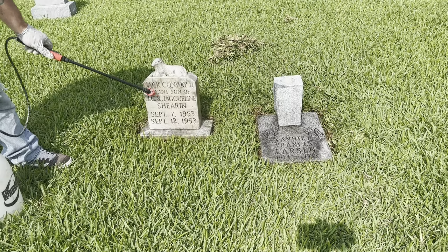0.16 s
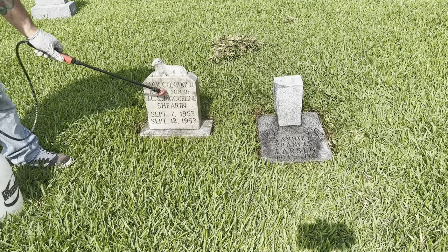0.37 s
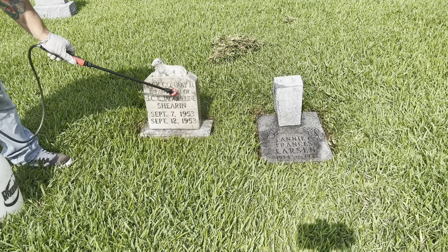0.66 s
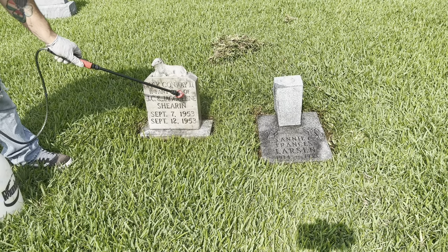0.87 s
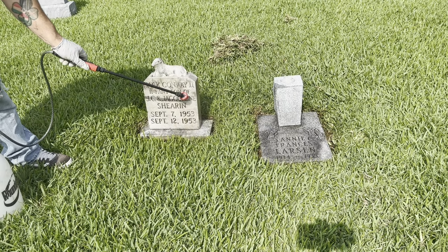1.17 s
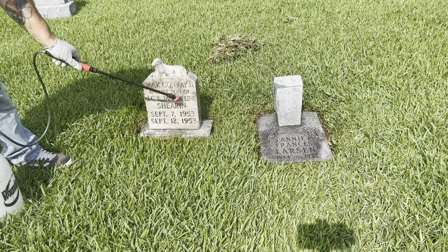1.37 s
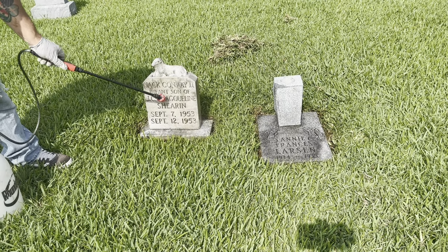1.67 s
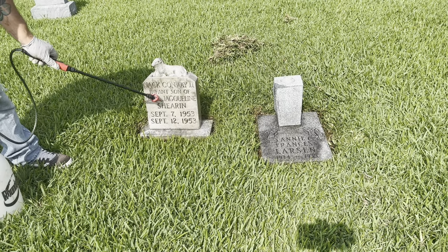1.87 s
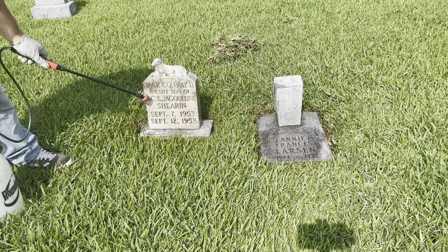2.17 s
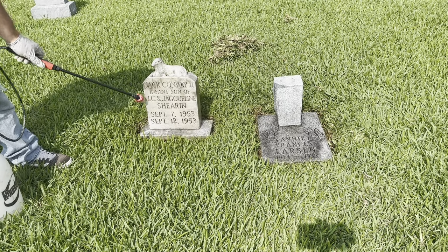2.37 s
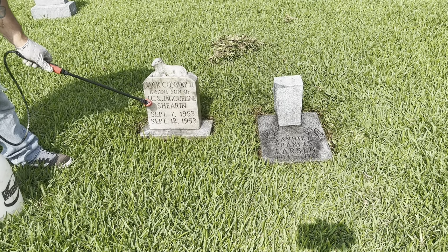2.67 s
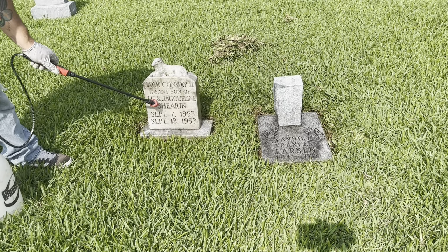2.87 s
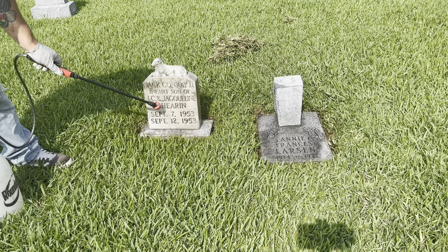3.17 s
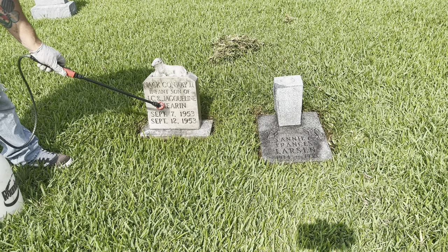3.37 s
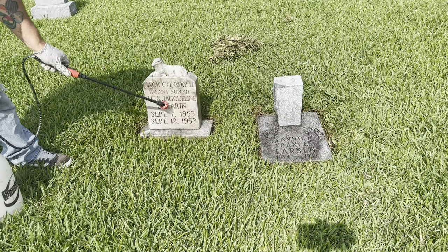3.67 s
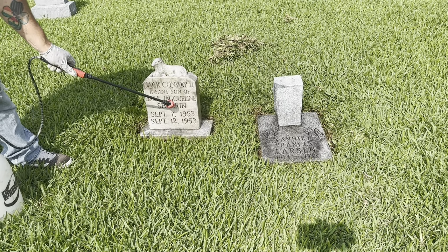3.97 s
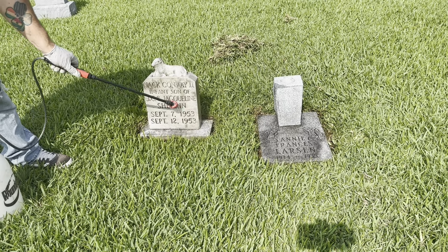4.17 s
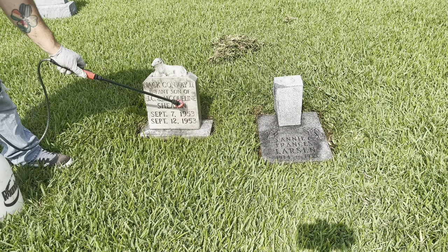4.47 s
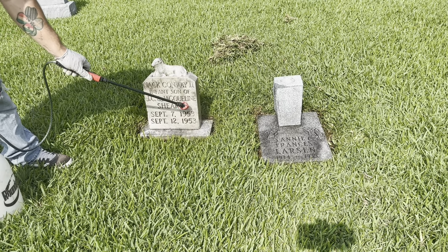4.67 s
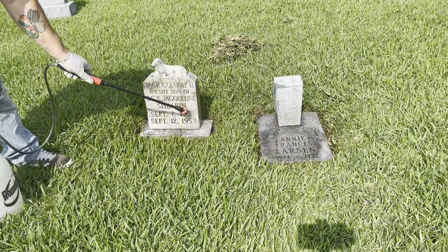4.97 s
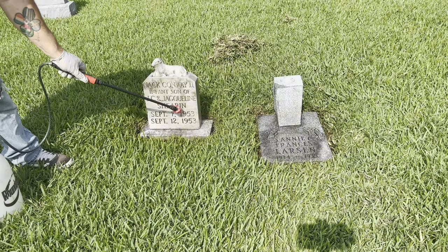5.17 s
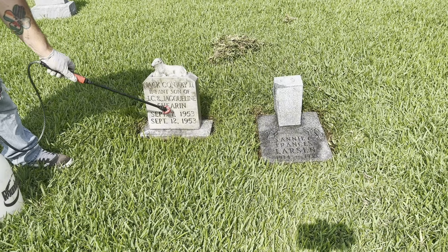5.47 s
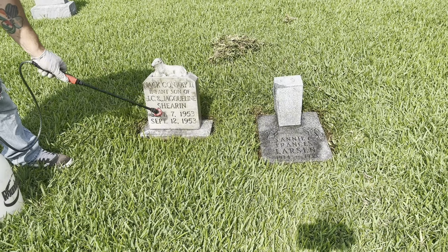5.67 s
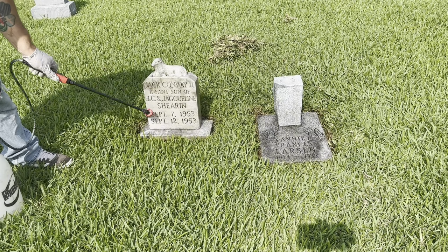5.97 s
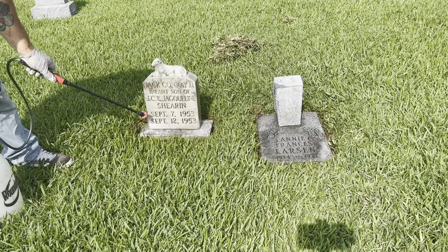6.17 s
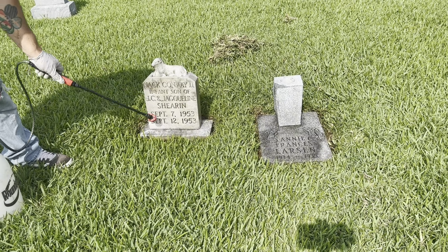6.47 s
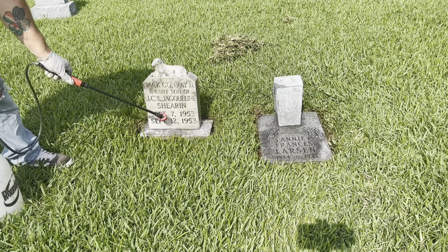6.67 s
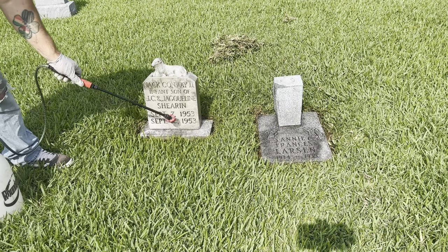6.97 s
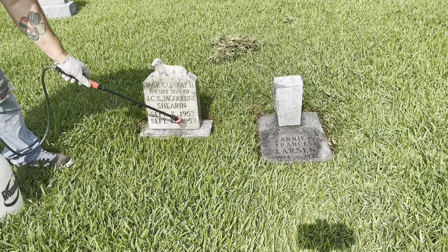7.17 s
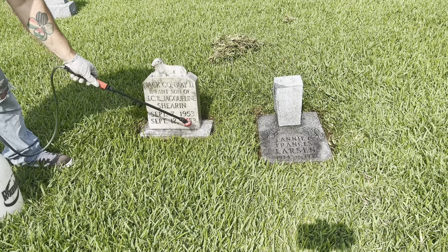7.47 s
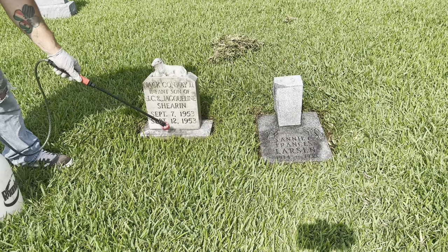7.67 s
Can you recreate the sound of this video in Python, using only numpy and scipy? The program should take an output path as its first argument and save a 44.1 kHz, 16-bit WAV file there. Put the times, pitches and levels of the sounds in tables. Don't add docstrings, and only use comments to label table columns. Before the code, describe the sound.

A hand sprayer's steady, bright hiss plays over stone close by outdoors, spitting and splashing, dipping at times, over a faint low traffic rumble.

```python
import sys
import numpy as np
from scipy import signal
from scipy.fft import rfft, irfft, next_fast_len
from scipy.io import wavfile
from scipy.ndimage import uniform_filter1d

SR = 44100
rng = np.random.default_rng(int(sys.argv[2]) if len(sys.argv) > 2 else 0)


def decibels_to_gain(level_db):
    exponent = np.asarray(level_db, float) / 20
    return 10 ** exponent


def wrap_up_sound(samples):
    columns = np.atleast_2d(samples).T
    tamed = np.clip(columns, -1, 1)
    steps = np.round(tamed * 32767).astype(np.int16)
    wavfile.write(sys.argv[1], SR, steps)


N = 344852
FAST = next_fast_len(N)
HOP = 128


def evened(x):
    return x / np.sqrt(np.mean(x ** 2) + 1e-20)


def read(points, hz):
    f, *values = np.transpose(points)
    return np.squeeze([np.interp(np.log(hz + 1), np.log(f + 1), v) for v in values])


def play(rows, t):
    s, *values = np.transpose(rows)
    return [np.interp(t, s, v) for v in values]


def bells(s, width, t):
    return np.exp(-.5 * ((t[:, None] - s) / width) ** 2)


def drift(rate, count):
    slope = 1 / (1 + (np.fft.rfftfreq(FAST, 1 / SR) / rate) ** 2)
    slope[0] = 0
    return evened(irfft(rfft(rng.standard_normal((count, FAST))) * slope, FAST)[:, :N])


def spectra(x, size=4 * HOP):
    return signal.stft(x, SR, nperseg=size, noverlap=3 * size // 4)


def sound(z):
    size = 2 * z.shape[-2] - 2
    return signal.istft(z, SR, nperseg=size, noverlap=3 * size // 4)[1][..., :N]


# t/s, force level/dB, slant/dB (+ wide fan, - hard point), spatter/dB, splash/dB
AIM = [(0, -43.5, -0.5, 3, -45.5), (.5, -39.5, 0, -0.5, -42.5), (.85, -42.5, 3.5, 0, -45.5),
       (1.3, -42, 3.5, 1, -47), (1.9, -41.5, 3, 4.5, -49), (2.35, -44.5, -1.5, 0, -38.5),
       (2.7, -44.5, 3.5, 4, -50.5), (3.1, -43, -1.5, -3.5, -50.5), (3.8, -43.5, -2, 0, -45.5),
       (4.5, -43.5, 4, 0.5, -46), (5.0, -46, 4.5, 2.5, -52.5), (5.55, -45.5, 1.5, 3, -47.5),
       (5.78, -45.5, 2.5, 1.5, -69), (6.2, -47, -2.5, 1, -44.5), (6.65, -49, -3, 0.5, -65),
       (6.9, -48, -1, 0.5, -48), (7.4, -52, -1, 3.5, -64.5), (7.82, -46.5, -1.5, -1.5, -57)]
# start t/s, fall/s, hold/s, recover/s, depth/dB
LULLS = [(1.363, 0.091, 0.18, 0.18, -12), (2.2, 0.12, 0.053, 0.15, -5.5), (3.301, 0.18, 0.046, .2, -7),
         (5.155, 0.078, 0.05, 0.18, -9), (5.697, 0.076, 0.028, 0.094, -9),
         (6.245, 0.082, 0.038, 0.11, -5.5), (6.577, 0.054, 0.016, 0.071, -4.5),
         (7.199, 0.12, 0.22, 0.15, -7)]
# t/s, fizz level/dB, middle follows by/dB
CATCHES = [(.02, 3.5, 0.5), (.3, 2, -2.5), (.42, -6, 3), (.48, 2, -2), (.63, -3, -0.5), (.93, 4.5, -2.5),
           (1.021, -0.5, -2), (1.35, 1.5, -1), (1.62, 0.5, 2.5), (1.7, -1, 2), (1.82, 2, -3),
           (2.0, -2, -0.5), (2.18, 4, -7), (2.27, 0.5, -2.5), (2.5, 6.5, -4.5), (2.6, 0, -2),
           (2.9, 5.5, -4), (3.14, -3, 1.5), (3.27, 2.5, 2), (3.881, 3, -4), (3.96, 1, 1), (4.02, -2, 2),
           (4.16, 1.5, 0.5), (4.22, 2, -4.5), (5.12, 2.5, 0), (5.48, 3, -4.5), (5.92, -4, 0),
           (6.03, -0.5, 0), (6.2, 2, 0), (7.05, -1, -4.5)]
# t/s, f/Hz
SPLASH_HZ = [(0, 1180), (.5, 1460), (1.2, 1160), (1.55, 1503), (2.7, 1260), (3.8, 1446), (4.9, 1278),
             (5.6, 1536), (5.75, 956), (6.6, 918), (6.85, 1227), (7.3, 959), (7.82, 1090)]


def jet(t):
    force, slant, spatter, splash = play(AIM, t)
    lull = 0
    for start, fall, hold, recover, depth_db in LULLS:
        lull = lull + np.interp(t, np.cumsum([start, fall, hold, recover]), [0, depth_db, depth_db, 0])
    s, top_db, middle_db = np.transpose(CATCHES)
    top, middle = (bells(s, 0.026, t) @ np.c_[top_db, middle_db]).T
    fizz = force + lull + top
    sizzle = spatter + 0.75 * middle
    patter = slant + middle + 0.028 * lull
    splash = splash + 0.27 * lull + 0.9 * (top + middle)
    octaves = 0.53 + .03 * slant
    return fizz, sizzle, patter, splash - fizz, play(SPLASH_HZ, t)[0], octaves


# t/s, peak level/dB
SPITS = [(0.407, -27), (0.599, -30), (0.63, -30), (0.649, -25), (1.7473, -24), (2.0581, -25), (2.154, -25),
         (2.175, -20), (2.182, -21), (2.187, -22), (2.4595, -31), (2.4792, -28), (2.7658, -30),
         (3.1837, -30), (3.9438, -29), (4.0567, -26), (5.0868, -27), (5.1376, -25), (5.3018, -33),
         (5.5322, -31), (5.878, -33), (6.0656, -31), (6.565, -35)]


def droplets(clumps_db=1.17, grain_db=-0.5, spit_s=0.00056, smooth_hz=3460.0):
    clumps = clumps_db * drift(28.0, count=1)
    grain = grain_db * drift(1800.0, count=1)
    crowd = evened(decibels_to_gain(clumps + grain)[0])
    s, db = np.transpose(SPITS)
    spit_db = db - 13 - jet(s)[0]
    kicks = np.bincount((s * SR).astype(int), decibels_to_gain(spit_db), N)[:N]
    kicks += 1.6 * rng.random(N) * (rng.random(N) < 200 / SR)
    crowd = crowd + signal.lfilter([1], [1, -np.exp(-1 / (spit_s * SR))], kicks)
    noise = rng.standard_normal((2, N))
    film = signal.lfilter(*signal.butter(1, smooth_hz, fs=SR), (crowd - 1) * noise)
    return crowd * noise - film


# t/s, off the lawn/ms, off the plinth left/ms, right/ms
ECHOES = [(0, 2.25, 0.76, 0.72), (.3, 1.56, 0.88, 0.64), (.8, 1.54, 0.88, 0.69), (1.1, 2, 0.73, 0.75),
          (1.8, 1.55, 0.74, 0.6), (2.3, 1.93, 0.78, .63), (2.7, 1.9, 0.69, 0.72), (3.1, 1.54, 0.58, 0.4),
          (3.6, 1.69, .45, 0.78), (4.4, 1.96, 0.71, 0.73), (5.05, 2.3, 0.456, 0.51), (5.4, 1.56, .72, 0.55),
          (6.3, 1.83, .81, 0.67), (6.8, 2.4, 0.52, 0.55), (7.82, 1.95, 0.61, 0.63)]
# later left/ms, later right/ms, strength/1
LAWN = [
    (0, .03, .32),
    (.31, .2, .32),
    (.68, .52, .2),
]


def echoes(hz, t, dull_hz=7060.0):
    lawn_ms, *plinth_ms = play(ECHOES, t)

    def late(ms):
        return np.exp(-2j * np.pi * hz * ms / 1000)

    paths = []
    for port in (0, 1):
        steps = sum(row[2] * late(row[port]) for row in LAWN)
        case = port * -.16 * late(.49)
        paths.append(late(lawn_ms) * steps + .28 * late(plinth_ms[port]) + case)
    return 1 + np.exp(-(hz / dull_hz) ** 2) * np.array(paths)


LAYER_HZ = (2200., 3900, 7250, 13100)
# f/Hz, level/dB per Hz
MIST = [(500, -15.5), (1200, -9.5), (2000, -4.5), (3000, -3), (5000, -2), (6300, -4), (7200, -2),
        (8500, -2), (10000, -4.5), (12000, 0), (15900, -1.5)]
# t/s, level/dB
GRASS = [(5.75, -59.5), (6.234, -46.5), (6.354, -57.5), (6.56, -56), (6.59, -65), (6.812, -83), (6.82, -65),
         (7.2, -63)]
# t/s, half length/s, f/Hz, width/octaves, level/dB
HOLLOWS = [(.1, .12, 6570, 0.12, 3), (1.05, .2, 4300, .2, 3), (2.05, 0.15, 6600, 0.1, 4.5),
           (3.75, 0.072, 1550, 0.37, 4), (4.2, .25, 720, .2, 7), (4.95, 0.18, 945, 0.2, 7),
           (1.9, 0.12, 8500, 0.17, -3.5), (5.438, 0.13, 1520, 0.33, 2), (6.201, 0.097, 1800, .15, 5),
           (6.89, 0.08, 3380, 0.058, 5.5), (7.763, .06, 700, 0.42, 15)]
# f/Hz, likeness/0-1, left leads/radians, left over right level/dB
PORTS = [(400, 0.28, 0, 0), (975, 0.71, 0.42, 3.5), (1990, 0.84, 1.52, -1.5), (2750, 0.91, 2.5, -2),
         (3940, 0.27, 2, 5), (5180, 0.76, 3, 6.5), (6920, 0.83, 0.93, 5), (7800, 0.7, 2.35, 3.5),
         (8540, 1, -2.1, 7), (9800, 0.8, -2.2, -3), (9830, 1, -2, -2.5)]


def spray(patchy_db=1.0, splash_db=4.0):
    hz, t, (near, other) = spectra(droplets())
    fizz, sizzle, patter, splash, centre, octaves = jet(t)
    octave = np.log2(hz + 1)[:, None]

    patter_swing = patter - patter.mean()
    layers = np.array([patter_swing, patter_swing, sizzle - sizzle.mean(), 0 * t])
    reach = read(np.c_[LAYER_HZ, np.eye(4)], hz)
    mist = decibels_to_gain(read(MIST, hz)[:, None] + reach.T @ layers)

    off_centre = (octave - np.log2(centre)) / np.maximum(octaves, .2)
    stone = decibels_to_gain(splash + splash_db) * np.exp(-.5 * off_centre ** 2)
    thud = decibels_to_gain(np.interp(t, *np.transpose(GRASS), -99, -99) - fizz + 11.5)
    grass = thud * np.exp(-.5 * ((octave - np.log2(690.0)) / 0.42) ** 2)
    body = np.hypot(mist, np.hypot(stone, grass))

    patches = rng.standard_normal((len(t), len(hz)))
    patches = uniform_filter1d(patches, size=40, axis=0)
    patches = evened(uniform_filter1d(patches, size=4, axis=1)).T
    s, half, ring_hz, ring_oct, ring_db = np.transpose(HOLLOWS)
    ring = ring_db * bells(np.log2(ring_hz), ring_oct, octave[:, 0]) @ bells(s, half, t).T
    colour = decibels_to_gain(fizz + 6.5 + ring + patchy_db * patches) * body

    same, lead, pan_db = read(PORTS, hz)[:, :, None]
    same = np.clip(same, 0, 1)
    right = same * near * np.exp(-1j * lead) + np.sqrt(1 - same ** 2) * other
    ports = np.array([near, right * decibels_to_gain(-pan_db)])
    return sound(colour * echoes(hz[:, None], t) * ports)


# t/s, level/dB
DRONE = [(0, -36), (.6, -39.5), (1.3, -39), (1.8, -43), (3, -44.5), (3.8, -42.5), (5, -42), (6.4, -41.5),
         (6.9, -40), (7.82, -44)]
# t/s, half length/s, depth/dB
FALTERS = [(0.045, 0.039, -22), (0.287, 0.062, -6), (1.6, .1, -7.5), (2.042, 0.076, -16.5),
           (2.457, 0.17, -9), (2.93, 0.042, -6), (3.256, 0.038, -7), (4.14, 0.084, -10.5),
           (4.401, 0.11, -4.5), (4.743, 0.032, -10), (5.277, 0.073, -8.5), (5.444, .04, -5.5),
           (5.912, 0.0571, -20), (6.1, 0.024, -13), (6.298, 0.056, -11), (6.66, 0.076, -9.5),
           (7.254, 0.1, -9), (7.596, 0.045, -6.5)]


def drone(t):
    s, width, db = np.transpose(FALTERS)
    falter = np.interp(t, t[::HOP], bells(s, width, t[::HOP]) @ db)
    return 80.5 + 0.32 * falter, play(DRONE, t)[0] + falter, falter


# f/Hz, level/dB per Hz
ROAD = [(15, -47), (25, -34), (54, -1), (81, -2.5), (104, -4.5), (266, -25.5), (421, -24.5), (678, -28.5),
        (1090, -28), (1180, -47), (2000, -32), (2600, -36), (4400, -120)]
# f/Hz, likeness/0-1
ROAD_SAME = [(60, 1), (120, 0.95), (240, 0.78), (480, 1), (950, 0.98), (1890, 0.41), (3770, 0.043),
             (15000, 0.6)]


def road(lumpy_db=1.0, lag_ms=0.37):
    hz = np.fft.rfftfreq(FAST, 1 / SR)
    tilt_db = -5.8 * np.log2(1 + hz / 4100.0)
    a, b = rfft(rng.standard_normal((2, FAST))) * decibels_to_gain(read(ROAD, hz) + tilt_db)
    same = np.clip(read(ROAD_SAME, hz), 0, 1)
    right = same * a * np.exp(-2j * np.pi * hz * lag_ms / 1e3) + np.sqrt(1 - same ** 2) * b
    wash = evened(irfft([a, right], FAST)[:, :N])
    bare_db = 0.012 * drone(np.arange(N) / SR)[2]
    return wash * decibels_to_gain(-42.0 + bare_db + lumpy_db * drift(8.3, count=1))


# t/s, f/Hz, level/dB
WHINES = [
    [(1.1, 306.1, -69), (1.152, 315.1, -69), (1.204, 334.5, -77), (1.482, 312.3, -85), (2.44, 320.5, -68),
     (2.61, 328.4, -65), (2.8, 324.5, -78)],
    [(5.6, 225.6, -61), (5.704, 226, -69), (5.818, 226.2, -82), (6.036, 235.8, -55.5), (6.326, 236, -57),
     (6.55, 238.7, -54)],
]


def engines(wobble_hz=2.68, throb_db=1.0, fade_s=0.21):
    t = np.arange(N) / SR
    waver, throb = drift(5.7, count=2)
    hz, db = drone(t)[:2]
    out = decibels_to_gain(db + throb_db * throb) * np.sin(2 * np.pi * np.cumsum(hz + wobble_hz * waver) / SR)
    for rows in WHINES:
        hz, db = play(rows, t)
        fade = np.clip(np.minimum(t - rows[0][0], rows[-1][0] - t) / fade_s, 0, 1)
        out += fade * decibels_to_gain(db) * np.sin(2 * np.pi * np.cumsum(hz) / SR)
    return np.sqrt(2) * out


# start t/s, end t/s, f/Hz, level/dB
CHIRP = (7.44, 7.52, 2756., -66.5)


def insect():
    t0, t1, hz, db = CHIRP
    t = np.arange(N) / SR
    fade = np.clip(np.minimum(t - t0, t1 - t) / 0.01, 0, 1)
    return decibels_to_gain(db) * fade * np.sin(2 * np.pi * hz * t)


def scene():
    pan_db = -2.5
    far = road() + engines() + insect()
    return spray() + far * decibels_to_gain([[pan_db / 2], [-pan_db / 2]])


def starved(z, hz, under_db):
    power = uniform_filter1d(uniform_filter1d(abs(z) ** 2, size=6, axis=1), size=3, axis=2)
    mask = uniform_filter1d(power.max(0), size=100, axis=0)
    band = np.minimum(np.arange(len(hz)) // 6 * 6 + 3, len(hz) - 1)
    block = np.arange(z.shape[2]) // 2 * 2
    weak = (power < mask * decibels_to_gain(2 * under_db))[:, band][:, :, block]
    return np.where(weak & (hz[:, None] > 1900), 0, z)


def roll_off(x):
    return signal.sosfilt(signal.butter(12, 16000, fs=SR, output="sos"), x)


# from f/Hz, to f/Hz, sign on the right, share of blocks left apart/0-1
SHARED = [
    (8400, 9650, 1, .04),
    (10380, 11800, -1, .2),
    (11800, 22050, 1, 0),
]
# t/s, up to f/Hz
APART = [(.25, 12500), (1.65, 12800), (1.76, 13500), (2.19, 13800), (2.39, 13100), (5.13, 12400),
         (5.3, 12600), (5.36, 12600)]
# start t/s, end t/s, from f/Hz, to f/Hz
MONO_PATCH = (.97, 1.22, 2100, 3600)


def record(dry):
    hz, t, z = spectra(dry, size=2048)
    block = (t * SR / 1024).astype(int)
    luck = rng.random((block[-1] + 1, len(SHARED), 2))[block]
    wander = drift(5.1, count=1)[0, np.minimum(block * 1024, N - 1)]
    edge_hz = 420.0 * np.round(wander)
    apart = np.zeros(z[0].shape, bool)
    for s, top in APART:
        apart |= np.outer((hz < top) & (hz > top - 3500), abs(t - s) < .013)

    turn = np.array([[1, 0.92], [1, -0.81]]) / np.sqrt(2)
    z = starved(z, hz, under_db=-10.5)
    z = starved(np.tensordot(turn, z, 1), hz, under_db=-8)
    z = np.tensordot(turn, z, 1)

    for k, (lo, hi, sign, share) in enumerate(SHARED):
        chance, depth = luck[:, k].T
        late_start = lo + (hi - lo) * depth ** 3
        ragged_start = lo + edge_hz * (k == 0) - 500 * depth ** 4 * (k < 2)
        start = np.where(chance < share, late_start, ragged_start)
        shared = (hz[:, None] >= start) & (hz[:, None] < hi) & ~apart
        z[1] = np.where(shared, sign * z[0], z[1])
    t0, t1, lo, hi = MONO_PATCH
    patch = np.outer((hz > lo) & (hz < hi), (t > t0) & (t < t1))
    z[1] = np.where(patch, z[0], z[1])
    return roll_off(sound(z * (hz < 16000)[:, None]))


dry = scene()
out = record(dry)
wrap_up_sound(out)
```